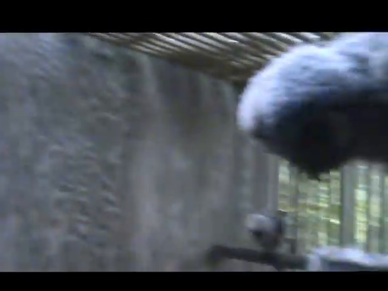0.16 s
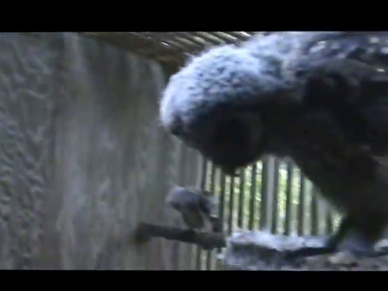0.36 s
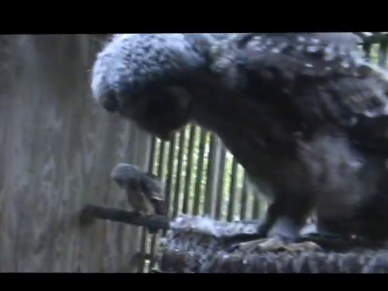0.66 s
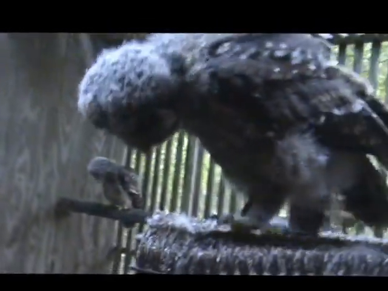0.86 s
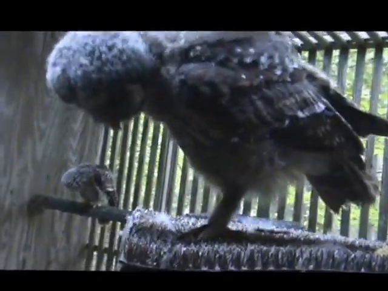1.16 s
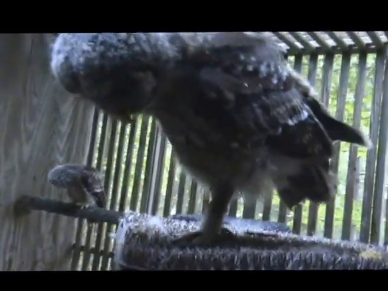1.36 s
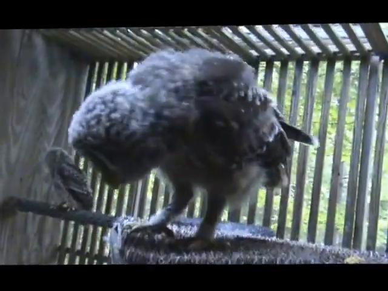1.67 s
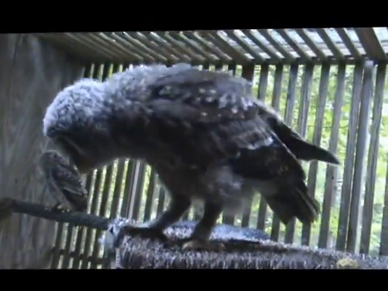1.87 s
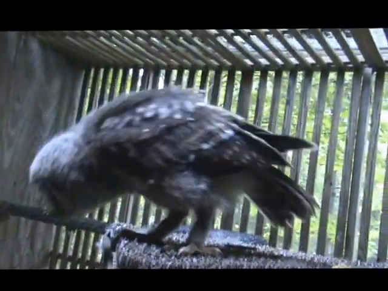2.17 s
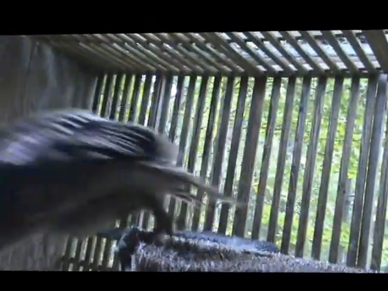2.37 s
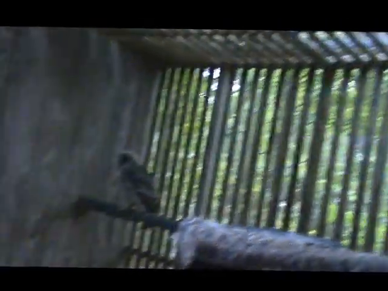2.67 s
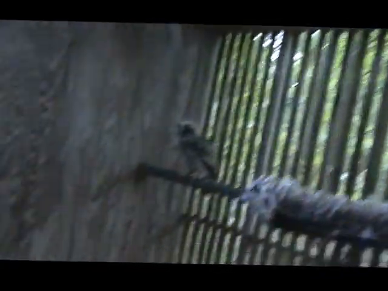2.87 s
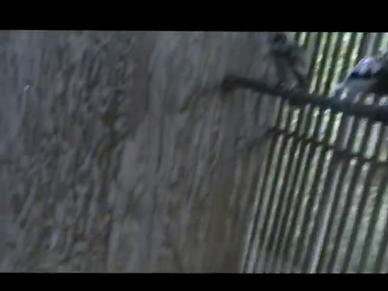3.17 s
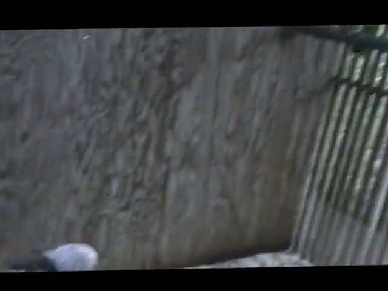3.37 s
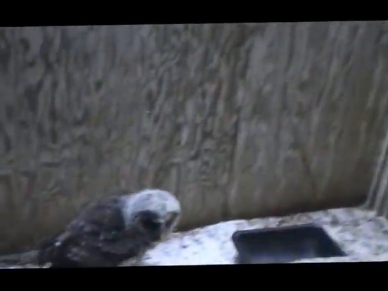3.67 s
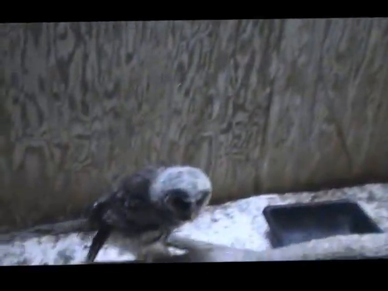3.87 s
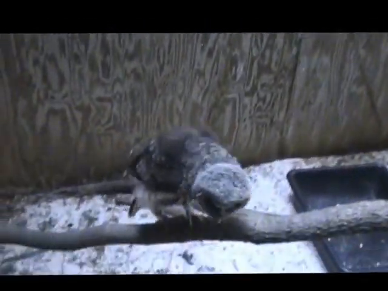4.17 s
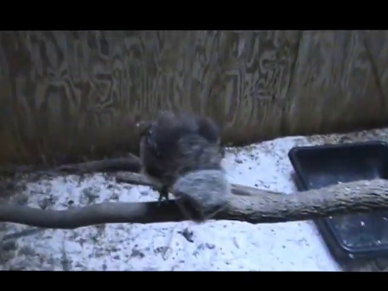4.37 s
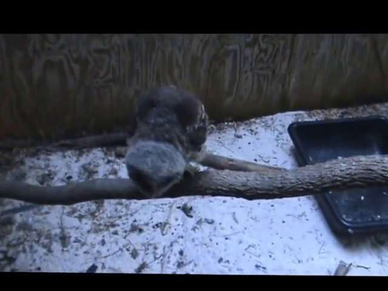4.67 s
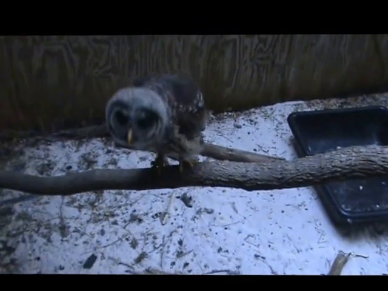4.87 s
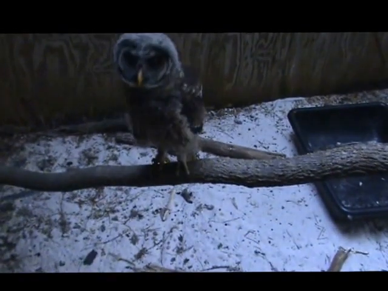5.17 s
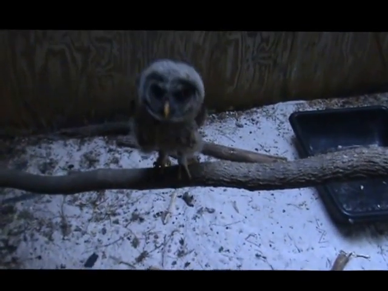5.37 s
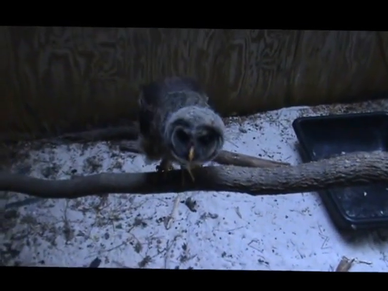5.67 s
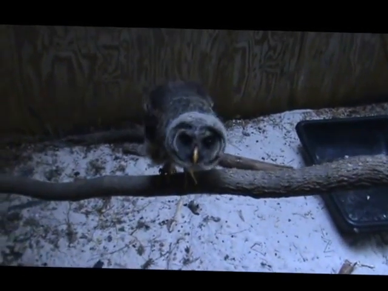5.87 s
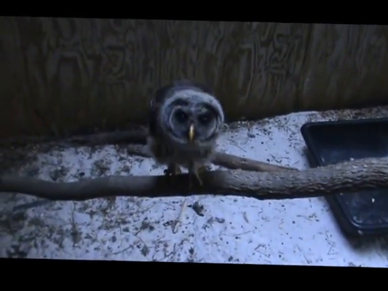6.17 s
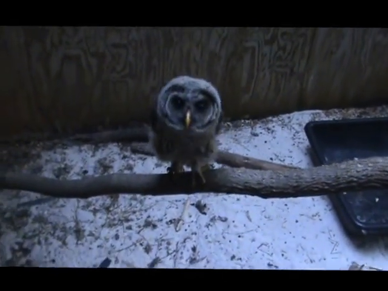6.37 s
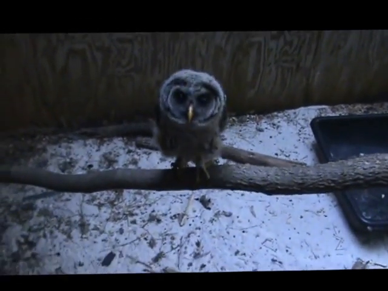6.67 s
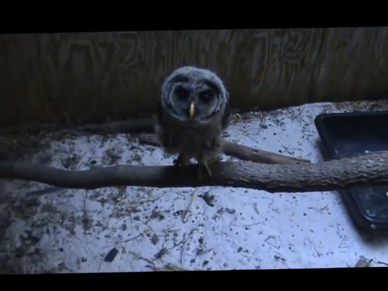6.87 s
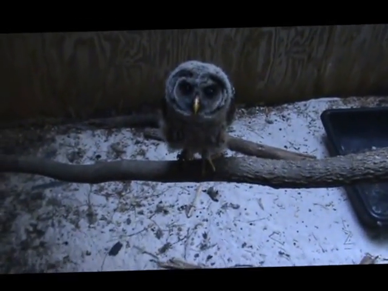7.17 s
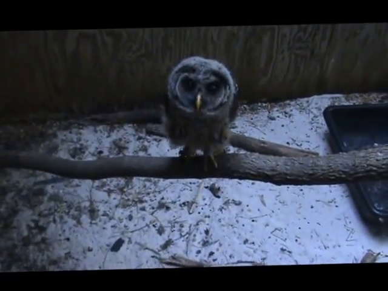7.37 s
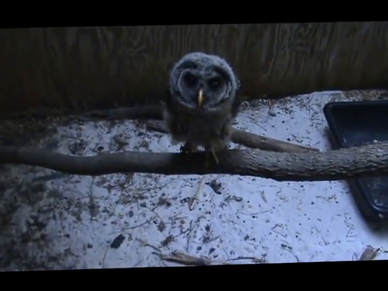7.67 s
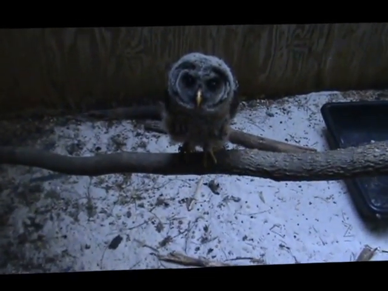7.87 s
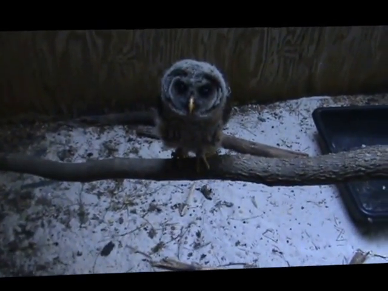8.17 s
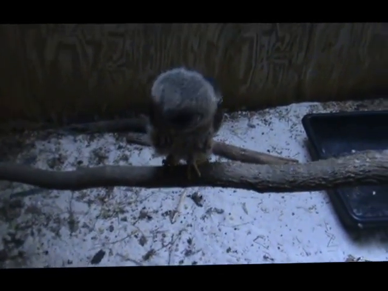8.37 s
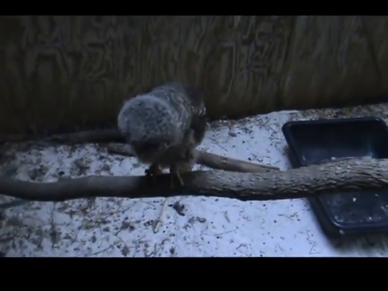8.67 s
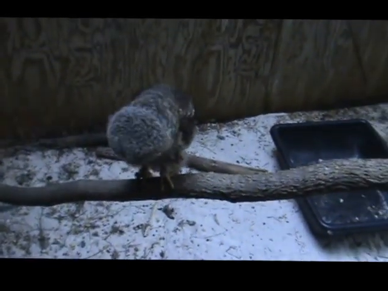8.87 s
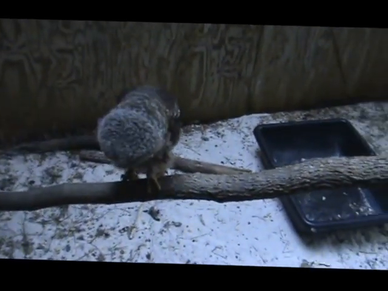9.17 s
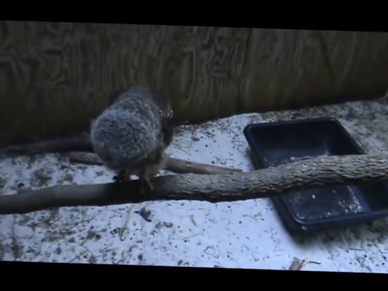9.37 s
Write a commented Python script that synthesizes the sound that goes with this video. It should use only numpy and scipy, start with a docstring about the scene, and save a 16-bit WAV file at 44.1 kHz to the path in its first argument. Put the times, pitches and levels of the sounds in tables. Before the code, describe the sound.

From the start, two shrill, breathy owlet screeches overlap, one a rising squeal and one a coarse rasp, ending by about 0.8 s. A thinner, fading whine follows until 1.8 s, with light taps on wood, then another hissing rasp until 2.4 s. A hollow perch thump and knocks mark a take-off at 2.4 s; wings brush and puff with landing clatters near 2.9 s. A screech comes at 3.1-3.7 s. After a pause, a low rasp and a piercing rising squeal overlap from 5 s, joined by a wavering rasp until 6.35 s, with knocks around 6-6.4 s. Then a quieter gap: faint bird slurs and whistles, soft woodland rush, and a distant low motor hum strongest near 8 s. A loud harsh screech fills 8.1-8.9 s, overlapped by a thin whine that sinks away by 9.5 s. Short, dull wooden reverberation surrounds the close calls.

```python
"""Owlets beg in a plywood aviary with long hissing screeches that overlap. Every screech slides up, is held,
then flares and falls away: two unsteady whistles, one from each side of the syrinx, beat inside a rush of air.
One owlet kicks off its perch, which booms; its wings rustle and puff, and short bursts knock on wood. Beyond
the walls wild birds whistle, slur and blur into bands of noise, the background rush rises and falls in level,
and a far motor hums. Everything inside also rings from the plywood as a short, dull reverberation."""
import sys
import numpy as np
from scipy import signal
from scipy.fft import rfft, irfft, next_fast_len
from scipy.io import wavfile
from scipy.ndimage import uniform_filter1d, minimum_filter1d, map_coordinates

SR = 44100
rng = np.random.default_rng(int(sys.argv[2]) if len(sys.argv) > 2 else 0)


def inscribe(sig):
    """Save sig as 16-bit PCM at rate SR to the path in sys.argv[1].

    A 1-D sig is mono; a 2-D sig holds one channel per row.
    Samples are clipped to [-1, 1] before scaling.
    """
    pcm = np.round(np.clip(np.atleast_2d(sig).T, -1, 1) * 32767)
    wavfile.write(sys.argv[1], SR, pcm.astype(np.int16))


N = 419391

# The held part of each screech: time_s, pitch_hz, relative whistle_db
OPENING_SQUEAL = [(0.088, 7686, -24), (0.268, 8240, -27), (0.354, 8520, -17), (0.503, 8970, -24.5)]
OPENING_RASP = [(0, 6850, -10), (.2, 6950, -19.5), (.28, 7600, -27), (.37, 7050, -20.5), (.53, 7250, -30.5),
                (.63, 6850, -19)]
THIN_WHINE = [(0.87, 5890, -28.5), (.99, 5590, -24), (1.15, 5540, -25), (1.42, 5434, -34),
              (1.63, 5480, -38), (1.75, 4860, -42)]
PERCH_RASP = [(1.78, 7690, -56), (1.85, 6700, -32), (1.92, 6514, -23), (2.28, 6830, -16.5)]
FLOOR_RASP = [(3.16, 6530, -35.5), (3.24, 6110, -19.5), (3.32, 6276, -23), (3.57, 6515, -15.5)]
LOW_RASP = [(4.96, 7010, -35), (5.06, 6260, -36), (5.14, 6040, -17), (5.35, 6070, -20.5), (5.41, 6360, -30),
            (5.532, 6310, -31)]
RISING_SQUEAL = [(5.05, 8170, -25), (5.09, 7550, -30), (5.13, 7210, -12.5), (5.18, 7380, -8.5),
                 (5.44, 8013, -19), (5.73, 8600, -18), (5.85, 9050, -26.5), (5.98, 9430, -28)]
WAVERING_RASP = [(5.63, 6940, -26), (5.71, 6900, -11), (5.79, 7340, -13), (5.94, 6510, -11.5),
                 (5.99, 7480, -15.5), (6.14, 6560, -14), (6.25, 6550, -11), (6.305, 6940, -10)]
LOUD_RASP = [(8.18, 7070, -9), (8.29, 6984, -8.5), (8.54, 7170, -11.5), (8.62, 6860, -8),
             (8.77, 6920, -10.5), (8.81, 7610, -20.5), (8.86, 7100, -7.5)]
CLOSING_WHINE = [(8.62, 6110, -36), (8.69, 5820, -22), (8.78, 5550, -21), (8.96, 5547, -18),
                 (9.16, 5236, -25.5), (9.25, 5530, -29.5), (9.42, 5234, -31.5)]
# Reverberation among the trees: frequency_hz, t60_s
FOREST = [(1500, 1), (4000, 0.77), (9000, 0.55)]


def amp(db):
    """Decibels to gain."""
    return 10 ** (np.asarray(db) / 20)


def unit(x):
    """Scale to rms 1."""
    return x / np.sqrt(np.mean(x ** 2) + 1e-20)


def along(points, hz):
    """Read (Hz, value) points on a log frequency axis."""
    point_hz, values = np.transpose(points)
    return np.interp(np.log(hz + 1), np.log(point_hz + 1), values)


def stroke(t, start_s, end_s):
    """Progress from 0 to 1 between two times."""
    return np.clip((t - start_s) / (end_s - start_s), 0, 1)


def bell(x, centre, width):
    """A smooth swell of height 1, down to 1/e at one width from its centre."""
    return np.exp(-((x - centre) / width) ** 2)


def add(track, s, sound):
    """Mix a sound into the track at time s; it may already be under way at time 0."""
    start = round(s * SR)
    part = sound[..., max(0, -start):N - start]
    first = max(0, start)
    track[..., first:first + part.shape[-1]] += part


def wobble(rate, size):
    """A smooth random curve through `rate` random knots a second."""
    knots = rng.standard_normal(int(size * rate / SR) + 4)
    return map_coordinates(knots, [np.arange(size) * rate / SR], mode="mirror")


def filtered(x, response):
    """Multiply the spectrum of x by a response of frequency."""
    size = x.shape[-1]
    padded = next_fast_len(size + 8192)  # room for the filter's ringing
    return irfft(rfft(x, padded) * response(np.fft.rfftfreq(padded, 1 / SR)), padded)[..., :size]


def noise(spectrum, size):
    """Coloured noise of rms 1."""
    return unit(filtered(rng.standard_normal(size), lambda hz: amp(along(spectrum, hz))))


def phase_of(hz):
    """Running phase of a frequency curve."""
    return 2 * np.pi * np.cumsum(hz) / SR


def rasp(hz, width_hz=800, below_hz=220):
    """Chaotic vibration: a band of noise that rides just under the pitch (width in noise knots a second)."""
    phase = phase_of(hz - below_hz)
    in_phase = wobble(width_hz, len(hz)) * np.sin(phase)
    quadrature = wobble(width_hz, len(hz)) * np.cos(phase)
    return unit(in_phase + quadrature)


def echoes(x, decay, width):
    """Stereo reverberation of decaying noise, each pitch at its own rate; both channels share the mid part."""
    hz, t, z = signal.stft(rng.standard_normal((2, SR)), SR, nperseg=256)
    fading = z * amp(-60 * t / along(decay, hz)[:, None])
    mid, side = signal.istft(fading, SR, nperseg=256)[1]
    tail = np.array([mid + width * side, mid - width * side])
    tail = np.pad(tail / np.linalg.norm(tail[0]), ((0, 0), (130, 0)))  # the tail starts 3 ms late
    return signal.fftconvolve(x[None], tail, axes=1)[:, :N]


def background(rush_db=7.0):
    """The rush of the woods, wide coloured noise, whose level rises and dips along a set curve; narrower bands
    come and go."""
    # Level of the rush over time, rush_db to be added: time_s, level_db
    rush_curve = [(0.0, -52), (2.93, -46.5), (3.6, -48), (3.97, -46.5), (5.37, -47), (5.66, -48.5),
                  (6.9, -53.5), (7.46, -52), (8.6, -55.5), (9.5, -52)]
    # Colour of the rush: frequency_hz, relative density_db
    rush_colour = [(15, -34), (25, -13.5), (113, -2), (173, -3), (209, -5.5), (457, -5.5), (666, -4.5),
                   (1270, -6), (1570, -10.5), (1950, -8), (3000, -10.5), (3340, -11.5), (4500, -16),
                   (6210, -17.5), (15500, -28.5)]
    # Stereo width of the rush: frequency_hz, side_to_mid_ratio
    side_share = [(60, 0.103), (130, 0.087), (300, 0.49), (15000, 0.57)]
    # Passing bands, the high ones far chatter: centre_s, half_width_s, centre_hz,
    # width_hz (noise knots a second), level_db
    passing_bands = [(1.7, 1.7, 820.6, 259.4, -45), (4.5, 1.1, 457, 229, -49), (9.2, 0.51, 795, 201, -48.5),
                     (4.3, .4, 3100, 221, -50.5), (4.3, .5, 4450, 250, -57), (7.2, 0.47, 3250, 160.4, -57),
                     (7.5, .6, 3800, 160.4, -66)]
    t = np.arange(N) / SR
    db = np.interp(t, *np.transpose(rush_curve)) + rush_db + 0.606 * wobble(6.7, N)
    mid = noise(rush_colour, N)
    side = filtered(noise(rush_colour, N), lambda hz: along(side_share, hz))
    humps = 0
    for s, half_s, hz, width_hz, level_db in passing_bands:
        band = rasp(np.full(N, hz), width_hz, below_hz=0)
        humps = humps + amp(level_db) * bell(t, s, half_s) * band
    return amp(db) * np.array([mid + side, mid - side]) + humps


def motor(middle_hz=131, rumble_db=-2.5):
    """A far motor: one wavering hum line over a dull rumble."""
    # Level of the hum: time_s, level_db
    motor_level = [(6.9, -58.5), (7.349, -49.5), (7.95, -45.5), (8.3, -53.5), (9.5, -52)]
    # Colour of the rumble: frequency_hz, relative density_db
    rumble_colour = [(30, -10), (80, 4.5), (250, 2.5), (500, 4), (900, -11), (3000, -43.5)]
    out = np.zeros(N)
    s, level_db = np.transpose(motor_level)
    db = np.interp(np.arange(s[0], s[-1], 1 / SR), s, level_db)
    size = len(db)
    line = unit(np.sin(phase_of(middle_hz + 0.53 * wobble(5.47, size))))
    hum = line * amp(wobble(8.2, size))
    add(out, s[0], amp(db) * (hum + amp(rumble_db) * noise(rumble_colour, size)))
    return out


def chorus(swell_db=4):
    """The farthest birds merge into narrow bands that swell and fade, heard only as reverberation."""
    # Far birds blurred into bands: centre_hz, level_db
    far_bands = [(2050, -93), (2450, -66.5), (3120, -60), (4450, -72.5), (5280, -59)]
    bands = 0
    for hz, db in far_bands:
        band = rasp(np.full(N, hz), width_hz=130, below_hz=0)
        bands = bands + amp(db) * unit(amp(swell_db * wobble(3.6, N)) * band)
    return echoes(bands, FOREST, width=0.85)


def wild_birds(direct_db=-6, echo_db=-2, notes_db=11.5):
    """Pure scooped whistles and buzzy slurs are swept sines of unsteady pitch, smeared by the trees."""
    # One bird's whistles, scooping up to a held note: start_s, length_s, pitch_hz, relative level_db
    scooped_whistles = [(1.507, 0.21, 2480, -42.5), (1.905, 0.15, 2460, -40.5), (2.723, 0.18, 2450, -43),
                        (3.152, 0.15, 2425, -38), (4.738, 0.2, 2440, -44), (5.106, 0.23, 2430, -42.5),
                        (5.671, 0.16, 2120, -41)]
    # Other birds' slurs: start_s, length_s, middle_pitch_hz, slide_octaves, relative level_db
    single_slurs = [(3.88, 0.074, 8600, -0.23, -51.5), (4.426, 0.078, 7400, 0.24, -43.5),
                    (4.59, 0.12, 3150, -0.15, -47.5), (4.7, 0.044, 2650, -0.35, -47),
                    (6.42, 0.067, 2900, -0.061, -53.5), (6.436, 0.047, 2420, -.02, -54),
                    (6.564, .05, 3515, -0.09, -56.5), (6.825, 0.13, 2556, -0.33, -50.5),
                    (7.467, 0.16, 8310, -0.53, -57.5), (7.823, 0.092, 3560, -.1, -53)]
    # Phrases of four even slurs: start_s, interval_s, length_s, first_pitch_hz, step_hz, slide_octaves,
    # relative level_db
    slur_phrases = [(6.788, .328, .12, 3297, 220.5, -0.183, -53.5),
                    (6.948, .333, 0.175, 1843, -48.5, -0.061, -57.5)]
    scoop, scoop_s = .09, 0.0403  # share of the pitch it starts below; time constant of settling
    whistle_warble, slur_warble = 0.012, .018  # pitch unsteadiness, as a share of the pitch
    slurs = list(single_slurs)
    for s, interval_s, length_s, hz, step_hz, slide, db in slur_phrases:
        slurs += [(s + k * interval_s, length_s, hz + k * step_hz, slide, db) for k in range(4)]
    notes = []
    for s, length_s, hz, slide, db in slurs:
        sliding_hz = hz * 2 ** (slide * np.linspace(-.5, .5, int(length_s * SR)))
        notes.append((s, sliding_hz, db, slur_warble))
    for s, length_s, hz, db in scooped_whistles:
        scooping_hz = hz * (1 - scoop * np.exp(-np.arange(0, length_s, 1 / SR) / scoop_s))
        notes.append((s, scooping_hz, db, whistle_warble))
    out = np.zeros(N)
    for s, hz, db, warble in notes:
        progress = np.linspace(0, 1, len(hz))
        swell = np.sqrt(np.abs(np.sin(np.pi * progress))) * amp(2.94 * wobble(30.1, len(hz)))
        note = np.sin(phase_of(hz * (1 + warble * wobble(130, len(hz)))))
        add(out, s, amp(db + notes_db) * swell * note)
    return amp(direct_db) * out + amp(echo_db) * echoes(out, FOREST, width=0.47)


def wings(beat_s=0.023, puff_lag_s=.045, puff_s=0.12, puff_db=-16):
    """At each beat feathers brush past, and a puff of air reaches the microphone a moment later."""
    # Wingbeats: centre_s, relative level_db
    wingbeats = [(2.838, -25.5), (2.99, -38.5)]
    # Colour of the rustle: frequency_hz, relative density_db
    feather_colour = [(18, -32), (30, -9), (1030, -4.5), (1110, -9), (1200, -1.5), (1600, -9), (2430, -7),
                      (2630, -9.5), (9390, -25), (15000, -49)]
    t = np.arange(N) / SR
    rustle = unit(noise(feather_colour, N) * amp(3.9 * wobble(150, N)))
    puff = noise([(20, -16), (60, 4.5), (200, -6), (450, -29), (2000, -69)], N)
    out = np.zeros(N)
    for s, db in wingbeats:
        brush = bell(t, s, beat_s) * rustle
        push = amp(puff_db) * bell(t, s + puff_lag_s, puff_s) * puff
        out += amp(db) * (brush + push)
    return out


def knocks(crack_db=-11, crack_t60=0.0064, hard_s=.009):
    """Each contact is a tiny crack and a short burst in a broad, dead resonance of the wood."""
    # Talons and bodies on wood: start_s, relative level_db, centre_hz, t60_s of the burst
    contacts = [(0.976, -38, 131, .13), (1.391, -38, 113.7, .13), (1.508, -16, 1880, 0.031),
                (1.549, -33, 136, 0.16), (2.388, -22.5, 447, 0.078), (2.407, -14.5, 1060, 0.019),
                (2.531, -27, 2450, 0.075), (2.875, -28.5, 190, 0.28), (2.899, -14, 824, .005),
                (2.968, -14.5, 1120, .011), (5.993, -20.5, 365, 0.23), (6.008, -18, 950, 0.067),
                (6.282, -29.5, 437, 0.097), (6.408, -22, 1020, 0.082)]
    out, t = np.zeros(N), np.arange(SR // 3) / SR
    for s, db, centre_hz, t60 in contacts:
        burst = rng.standard_normal(len(t)) * amp(-60 * t / t60)
        width_hz = centre_hz / 2

        def resonance(hz):
            damping = 1j * hz * width_hz
            return (damping / (centre_hz ** 2 - hz * hz + damping)) ** 2

        knock = filtered(burst, resonance)
        # Short, hard contacts crack more than soft thumps.
        hardness = min(1, hard_s / t60)
        crack = amp(crack_db - 60 * t / crack_t60) * rng.standard_normal(len(t)) * hardness
        add(out, s, amp(db) * (knock / np.abs(knock).max() + crack))
    return out


def perch(kick_s=2.405, settle_s=0.018):
    """The kicked perch booms as a decaying sine, its pitch sinking as the strain lets go."""
    # The owlet kicks off: relative level_db, start_hz, end_hz, t60_s
    thump = (-21, 253, 166, 0.24)
    db, start_hz, end_hz, t60 = thump
    out, t = np.zeros(N), np.arange(SR // 3) / SR
    hz = end_hz + (start_hz - end_hz) * np.exp(-t / settle_s)
    add(out, kick_s, amp(db - 60 * t / t60) * np.sin(phase_of(hz)))
    return out


def gesture(held, rise_s, fall_s, last_hz, flare_db, first_hiss_db, last_hiss_db,
            hiss_attack_db=12, hiss_release_db=14):
    """Slide up, hold, flare and fall: the start time, then pitch, whistle dB and hiss dB sample by sample."""
    onset_pitch, attack_db = .6, 11.5  # starts at this share of its held pitch, this much weaker
    fall_bend = 1.2  # above 1, the closing fall gathers speed
    flare_at, flare_width = .48, 0.19  # as shares of the fall
    flare_hiss_db, release_db = 3.5, 8  # the air surges in the flare; the whistle's loss over the fall
    s, hz, db = np.transpose(held)
    t = np.arange(s[0] - rise_s, s[-1] + fall_s, 1 / SR)
    rising, falling = 1 - stroke(t, t[0], s[0]), stroke(t, s[-1], t[-1])
    pitch = np.interp(t, s, hz) * (1 - (1 - onset_pitch) * rising ** 2)
    pitch = pitch + (last_hz - hz[-1]) * falling ** fall_bend
    flare = bell(falling, flare_at, flare_width)
    held_db = np.interp(t, s, db) - attack_db * rising ** 2 - release_db * falling ** 2
    strength = amp(held_db) + amp(flare_db) * flare * (falling > 0)
    air_db = first_hiss_db + (last_hiss_db - first_hiss_db) * stroke(t, s[0], s[-1])
    air_db = air_db - hiss_attack_db * rising ** 2 + flare_hiss_db * flare - hiss_release_db * falling ** 4
    return t[0], pitch, 20 * np.log10(strength), air_db


def whistle(hz, rough, waver_hz=26, jitter_hz=170, flutter_db=2.5):
    """One side of the syrinx: turbulence shakes its pitch and strength."""
    size = len(hz)
    waver = waver_hz * wobble(59.57, size)
    jitter = jitter_hz * np.sqrt(abs(rough)) * wobble(900, size)
    phase = phase_of(hz + waver + jitter)
    return unit(amp(flutter_db * wobble(109.3, size)) * np.sin(phase))


def octave(hz, upper_hz, line_db=-3, sum_db=-7):
    """A broad airy overtone, with faint lines at the upper voice's octave and at hz + upper_hz."""
    octave_line = amp(line_db) * whistle(2 * upper_hz, rough=0.19)
    sum_line = amp(sum_db) * whistle(hz + upper_hz, rough=0.12)
    return unit(rasp(2 * hz, width_hz=2600, below_hz=-150) + octave_line + sum_line)


def hiss(upper_hz, throat_db, low_db, pipe_hz=977, colouring=0.94, ripple_db=0.5, drift=0.065,
         patch_db=3.0, edge_db=10, edge_hz=800, splutter_db=2, surge_db=0.92):
    """Air hisses through the windpipe, whose evenly spaced resonances drift as the neck moves."""
    # Air through the open bill, before the colouring share: frequency_hz, relative density_db
    bill_air = [(300, -48), (600, -24), (950, -12.5), (1500, -13), (2050, -12.5), (2700, -13), (3300, -5.5),
                (4300, -2), (5300, 4), (6500, 4.5), (7400, 5), (8200, -0.5), (10500, -14.5), (15000, -55.5)]
    size = len(upper_hz)
    hz, t, z = signal.stft(rng.standard_normal(size), SR, nperseg=512)
    hz = hz[:, None]

    def framed(curve):
        return np.interp(t, np.arange(size) / SR, curve)

    spacing_hz = pipe_hz * (1 + drift * framed(wobble(5.07, size)))
    ripple = ripple_db * np.cos(2 * np.pi * hz / spacing_hz)
    # The throat's hollow varies by screech; a narrow resonance is in every hiss.
    hollow = throat_db * bell(hz, pipe_hz, 300) + 5 * bell(hz, 2050, 130)
    # Below about 4500 Hz the hiss depends on how wide the bill is open.
    gape = low_db / (1 + (hz / 4500) ** 12)
    # The hiss falls off just above the whistles, wherever they go.
    edge = edge_db * np.clip((hz - framed(upper_hz)) / edge_hz, 0, 1)
    # Random uneven patches in frequency and time roughen the hiss.
    speckle = uniform_filter1d(rng.standard_normal(z.shape), size=3, axis=0)
    patches = patch_db * unit(uniform_filter1d(speckle, size=14, axis=1))
    db = colouring * (along(bill_air, hz) - edge) + ripple + hollow + gape + patches
    air = signal.istft(z * amp(db), SR, nperseg=512)[1][:size]
    return unit(air * amp(splutter_db * wobble(420, size) + surge_db * wobble(37.5, size)))


def owlets(glide_hz_per_s=26000):
    """Two beating whistles, their rasp, an airy overtone and a spluttering hiss make each screech."""
    # One screech a row: held_part, rise_s, fall_s, last_hz, flare_db, first_hiss_db, last_hiss_db,
    # second_voice_offset_hz, second_voice_db, octave_db, roughness (0-1), throat_hollow_db, low_hiss_db,
    # left_minus_right_db; levels are relative
    screeches = [ (OPENING_SQUEAL, 0.041, .092, 4500, -9, -55, -38, 540, -9.5, -35.5, 0.018, 0, 2, 1.4),
                 (OPENING_RASP, .03, .13, 5150, -10, -27.5, -28, 400, -2.5, -48.5, 0.266, .5, 0, 1.61),
                 (THIN_WHINE, .04, .07, 1700, -30.5, -45, -42, 500, -3.5, -15.5, 0.019, 12.6, 1, 5.2),
                 (PERCH_RASP, 0.055, .11, 4200, -14, -39, -26.5, 260, -4, -48.5, .16, 1.8, 0, -.3),
                 (FLOOR_RASP, .06, .088, 4400, -14.5, -45.5, -32.5, 590, -8, -38, 0.22, 6.7, 2.7, -0.37),
                 (LOW_RASP, .03, .066, 4500, -7.5, -43.5, -29.5, 350, -8.5, -24.5, 0.26, 3.6, 1, 0),
                 (RISING_SQUEAL, 0.037, .09, 4400, -7, -37.5, -41.5, 140, -16.5, -51.5, 0.0046, 5.7, 12, 2),
                 (WAVERING_RASP, .04, .05, 4600, -19, -26.5, -30.5, 440, -2.1, -50, 0.32, 0.92, -4, -.7),
                 (LOUD_RASP, .046, .064, 4300, -21, -28.5, -29, -320, -1, -55.5, 0.13, -5.5, 0, -0.96),
                 (CLOSING_WHINE, .03, .16, 4450, -41, -40.5, -44.5, 390, -1.1, -16, 0.024, 12, -1, 5), ]
    wander_hz, wander_per_s = 38, 16  # slow drift of the held pitch
    rough_growth = .6  # how strongly roughness follows the airflow
    slack_octave_db = 10  # the overtone gains this much as the syrinx slackens
    edge_s = .006  # fade at either end
    out = np.zeros((2, N))
    for *shape, offset_hz, second_db, octave_db, rough, throat_db, low_db, pan_db in screeches:
        s, hz, whistle_db, hiss_db = gesture(*shape)
        hz = hz + wander_hz * wobble(wander_per_s, len(hz))
        upper_hz = hz + np.maximum(offset_hz, 0)
        # In the closing fall the syrinx relaxes into one cleaner whistle.
        falling = uniform_filter1d(np.maximum(-np.gradient(hz) * SR, 0), size=800)
        tension = 1 / (1 + (falling / glide_hz_per_s) ** 2)
        airflow = amp(rough_growth * (hiss_db - hiss_db.max()))
        rough = np.clip(rough * airflow, 0, 1) * tension
        first_voice = whistle(hz, rough)
        second_voice = amp(second_db) * np.sqrt(tension) * whistle(hz + offset_hz, rough)
        voices = unit(first_voice + second_voice)
        tone = amp(whistle_db) * (np.sqrt(1 - rough) * voices + np.sqrt(rough) * rasp(hz))
        # The airy overtone draws on both the whistle and the airflow.
        overtone_db = octave_db + slack_octave_db * (1 - tension) + (whistle_db + hiss_db) / 2 + 10.0
        overtone = amp(overtone_db) * octave(hz, upper_hz)
        air = amp(hiss_db + 9) * np.sqrt(tension) * hiss(upper_hz, throat_db, low_db)
        edges = signal.windows.tukey(len(hz), 2 * edge_s * SR / len(hz))
        pan = amp([[pan_db / 2], [-pan_db / 2]])
        add(out, s, edges * (tone + overtone + air) * pan)
    return out


def scene():
    """The owlets sound inside the plywood walls, the rest comes through the slats, slightly to the right."""
    # Reverberation of the plywood walls: frequency_hz, t60_s
    plywood_decay = [(150, 0.1), (1000, 0.15), (6000, 0.21), (14000, 0.011)]
    inside = owlets() + perch() + knocks() + wings()
    outside = wild_birds() + chorus() + background() + motor()
    walls = amp(-9) * echoes(inside.mean(axis=0), plywood_decay, width=0.52)
    return amp(-1.94) * inside + walls + outside * amp([[-.5], [.5]])


def record(dry, top_hz=15750):
    """A fast limiter turns down peaks near full scale; nothing is kept above the band limit."""
    needed = np.minimum(1, .98 / (np.abs(dry).max(axis=0) + 1e-9))
    gain = uniform_filter1d(minimum_filter1d(needed, size=200), size=150)
    return filtered(dry * gain, lambda hz: hz < top_hz)


dry = scene()
out = record(dry)
inscribe(out)
```